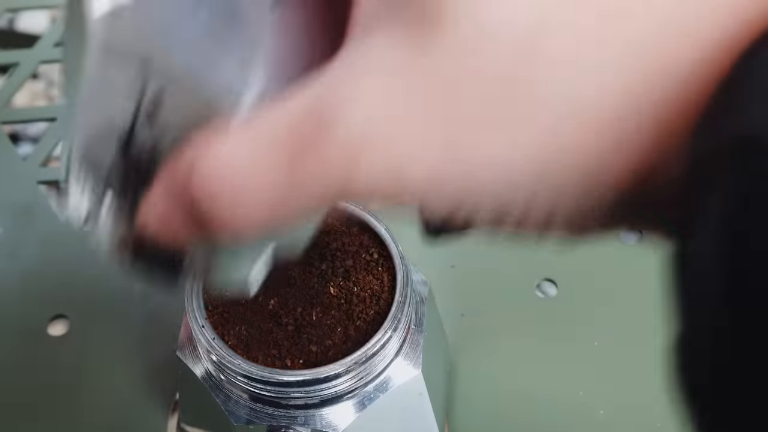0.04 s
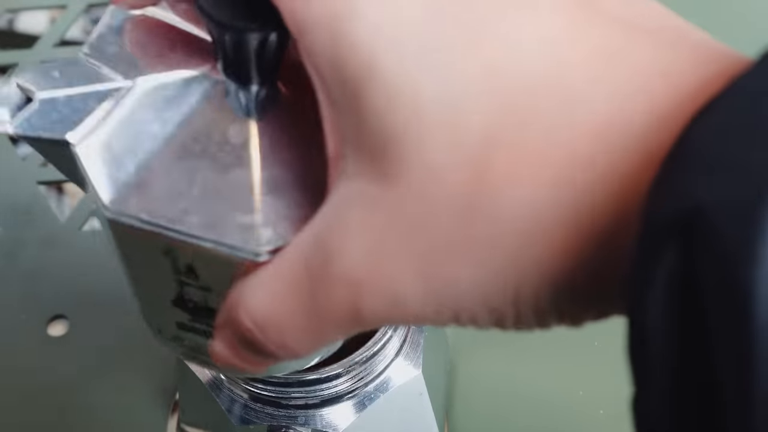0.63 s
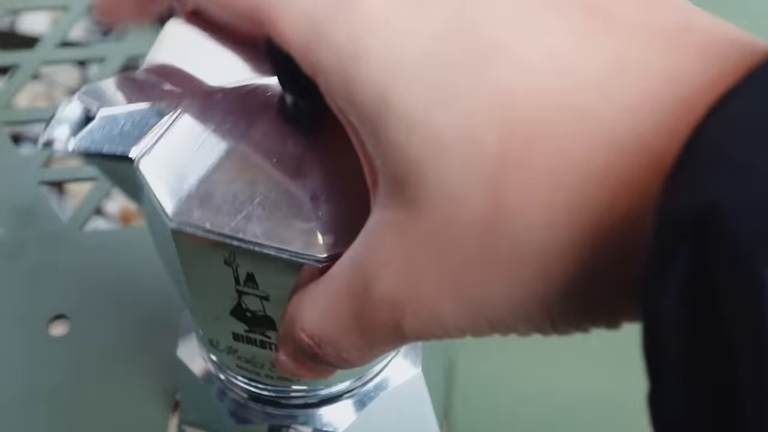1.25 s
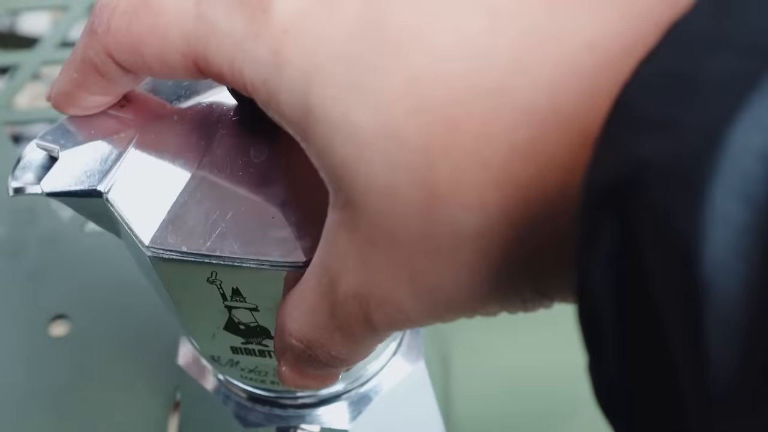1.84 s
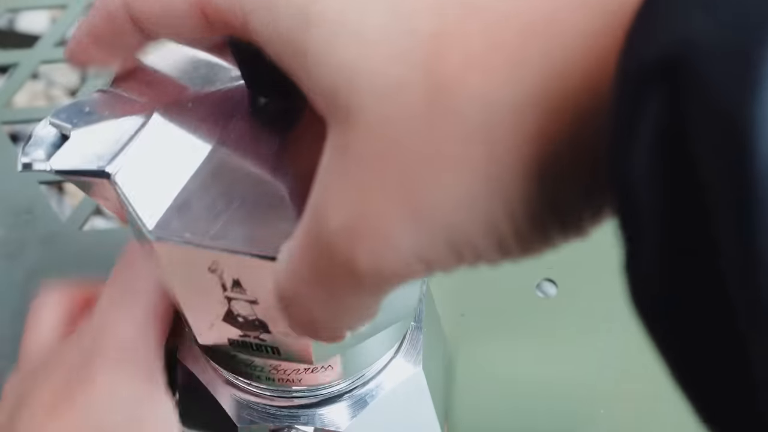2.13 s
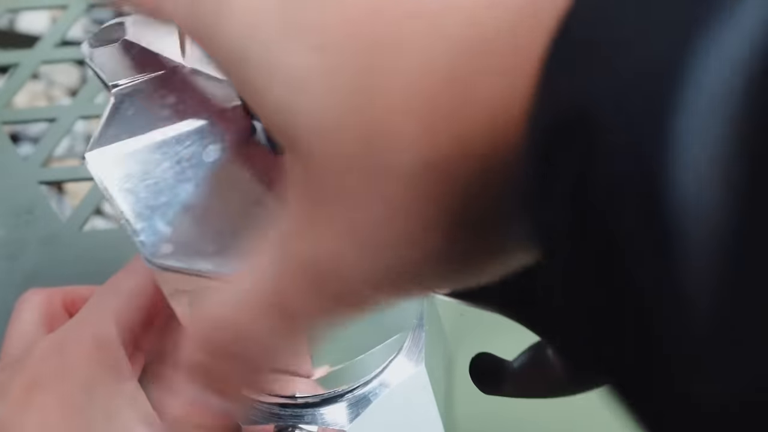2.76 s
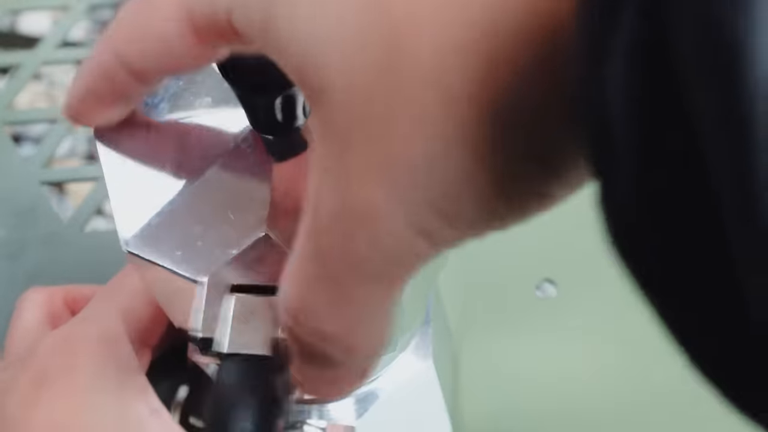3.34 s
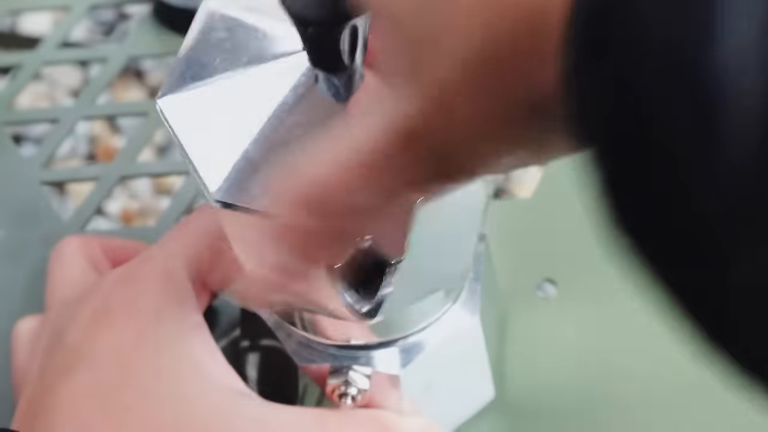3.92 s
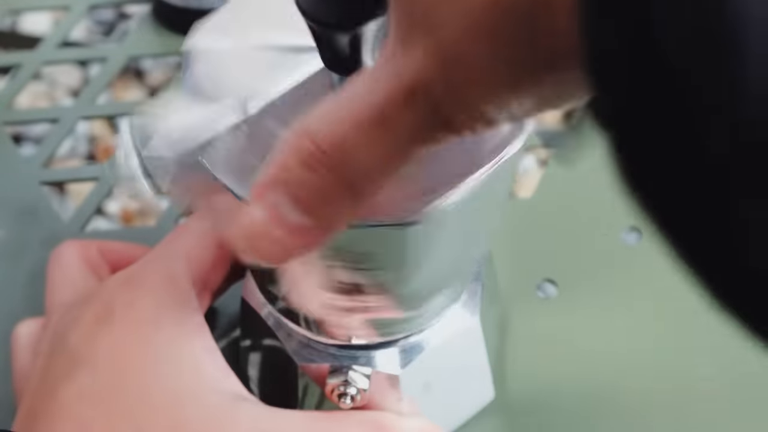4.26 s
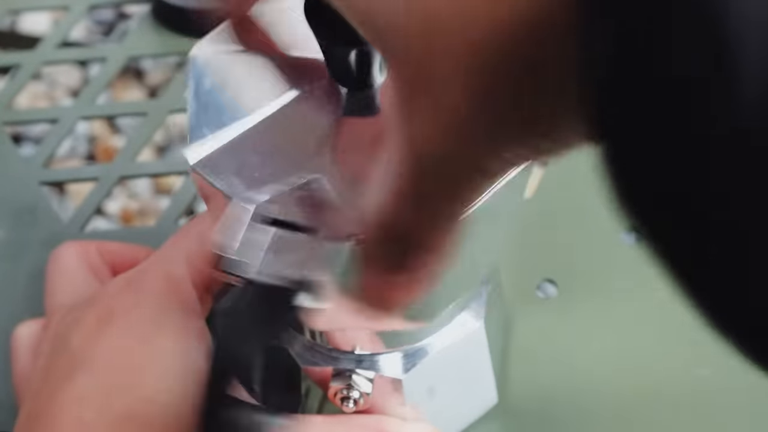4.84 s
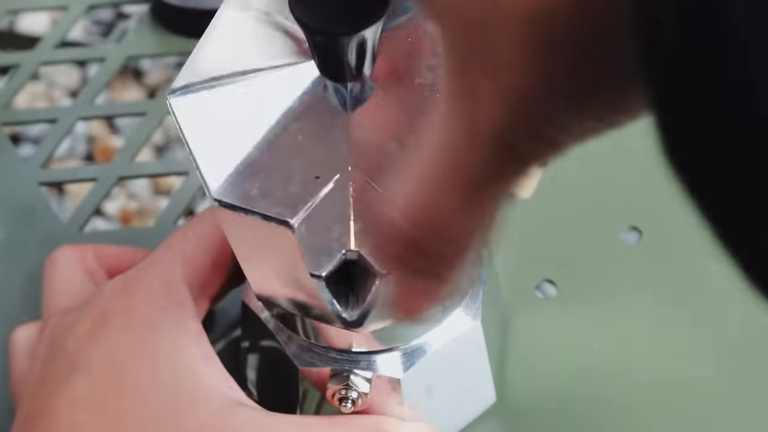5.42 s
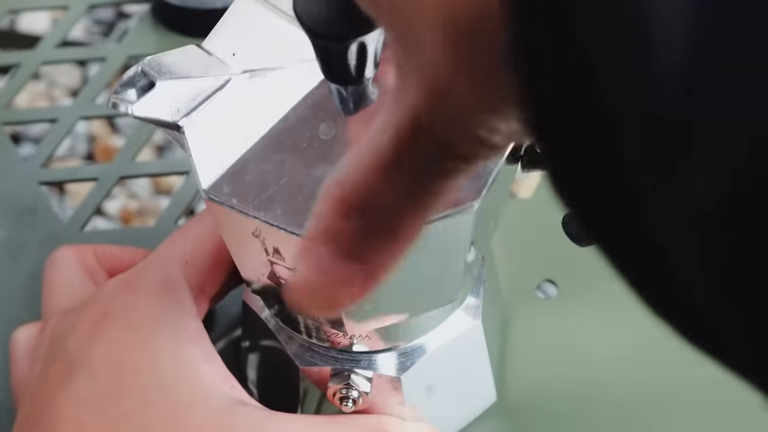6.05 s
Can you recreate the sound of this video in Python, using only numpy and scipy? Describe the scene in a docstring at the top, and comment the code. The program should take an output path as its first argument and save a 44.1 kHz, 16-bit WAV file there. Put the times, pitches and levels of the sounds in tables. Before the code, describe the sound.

A metal stovetop coffee pot is screwed together outdoors, with sharp clinks and short, gritty rasping twists.

```python
"""An aluminium stovetop coffee pot is screwed together on a garden table, close to the microphone.
The top half clinks onto the base, drops into the thread and goes down in rasping twists: the dry
threads catch and slip, crush grit and now and then squeak. Fingers brush the metal in between, and
the table booms faintly under a few hard knocks. The pot is centred and almost mono, with a short
tail from nearby walls; far behind it lies a low outdoor rumble."""
import sys
import numpy as np
from scipy import signal
from scipy.fft import rfft, irfft, next_fast_len
from scipy.io import wavfile
from scipy.ndimage import uniform_filter1d

SR = 44100
rng = np.random.default_rng(int(sys.argv[2]) if len(sys.argv) > 2 else 0)


def log_audio(samples):
    """Write samples as a 16-bit WAV file to the path given in sys.argv[1]."""
    # one column per channel
    frames = np.atleast_2d(samples).T
    # limit to full scale, then quantise
    limited = np.clip(frames, -1, 1)
    pcm = np.round(limited * 32767).astype(np.int16)
    wavfile.write(sys.argv[1], SR, pcm)


N = 268249
TIME = np.arange(N) / SR

# metal knocking on metal:
# (time [s], force [dB], treble [dB], chatter t60 [s], relative ring [dB], pitch the spot favours [Hz])
CLINKS = [ (.3163, -35.5, 0, 0.042, -22, 3700), (.681, -40, -5, .02, 7.5, 1315),
          (.698, -30.5, -4, 0.01, -17, 3560), (.727, -36, 1, 0.023, -7, 5970),
          (.7632, -27.5, 6.5, 0.019, -5.5, 4560), (.8525, -16, 0, 0.053, -11.5, 4240),
          (.866, -22.5, -9, 0.098, -11, 2780), (.914, -18.5, 9, 0.018, -11, 4600),
          (.925, -22, 7, 0.25, -2.5, 3676), (1.2295, -35, -12, 0.039, -13, 3800),
          (1.254, -40, -14, 0.017, -13, 2860), (1.332, -41.5, 1, 0.013, -15, 3700),
          (1.4823, -36.5, -8, 0.056, -21, 3720), (2.4531, -35, -25, 0.071, -18, 3740),
          (2.5303, -18, 5.5, 0.12, -5, 2833), (2.539, -22, 1, 0.059, -4, 2823),
          (2.549, -19.5, -2, 0.2, 0, 3550), (2.9994, -38, -17, 0.039, -12, 3800),
          (3.047, -40, -11, .04, -16, 3897), (3.11, -40, -12, 0.019, -27, 3800),
          (3.3435, -38, 4, 0.035, -6, 4485), (3.3938, -35, -18, 0.13, -23, 3920),
          (3.4821, -31, -7, 0.082, 3.5, 3600), (3.586, -44, 3, .03, -16, 3700),
          (3.603, -30.5, -7, 0.027, -24, 3730), (3.915, -19.5, 1, 0.029, 0, 3476),
          (3.974, -26, 2, 0.018, -16, 3980), (4.1642, -32, -10, 0.028, -49, 3670),
          (4.203, -29.5, 4.5, 0.02, -1, 8690), (4.2579, -20.5, 4.5, 0.062, -9, 3560),
          (4.274, -24, 10, 0.054, -6.5, 3820), (4.3187, -32, 8, .02, -7, 6400),
          (4.3486, -30.5, 4, .028, -8, 3897), (4.400, -23, -1.5, 0.13, -20, 3560),
          (4.4751, -31.5, 7.5, .021, -4.5, 6320), (4.5676, -26, 2, 0.071, -8, 6460),
          (4.588, -25.5, 9, 0.046, -3, 6440), (4.602, -24, -7, 0.025, -5.5, 3790),
          (4.6521, -24, 2.5, 0.045, -16, 6370), (4.74, -39.5, 0, 0.029, -12, 6440),
          (4.8665, -18.5, -15, 0.029, -2.5, 3800), (5.0103, -18, -9, 0.028, -1.5, 3820),
          (5.2217, -23.5, -11, 0.019, -12, 3580), (5.2441, -18, -26, 0.013, -8.5, 3640),
          (5.276, -38.5, 14, .039, 9, 7540), (5.3087, -16, -3.5, 0.11, -4, 3940),
          (5.5577, -35, 7, 0.011, -4.5, 7400), (5.6627, -23.5, -5, 0.047, -8, 3320),
          (5.699, -28.5, 5, 0.057, -13, 6400), (5.7786, -32, -16, .035, -17, 3320),
          (5.9182, -41, 3, .02, 0, 6400), (5.954, -36, -16, .025, -19, 3930),
          (5.9926, -18, -6, 0.049, 0.5, 3480), (6.071, -25, 3, 0.048, 4.5, 3760)]
# the halves sliding on each other:
# (time of full pressure [s], hold [s], pressure [dB], rise [s], fall [s], treble [dB], bass [dB])
STROKES = [ (.70, 0.1, -43.5, 0.015, 0.038, 7, -10), (0.854, .045, -28.5, .05, 0.08, 5, -7.5),
           (2.535, 0.042, -29, 0.012, .06, 13.5, -3.5), (3.097, 0.019, -33, 0.12, 0.1, -7, 9),
           (3.482, .012, -28, 0.0085, 0.084, -3, 6.5), (3.576, 0.033, -41, .04, 0.14, -11, 8),
           (3.915, 0.037, -23.5, 0.11, 0.061, -0.5, 3.5), (4.216, 0.14, -30, 0.042, .05, 0, 0.5),
           (4.569, 0.026, -26.5, 0.036, 0.1, 1, -0.5), (4.651, .018, -32, 0.0086, 0.087, 4.5, 2),
           (4.866, .04, -35.5, 0.0078, 0.068, -7, 4), (4.953, 0.084, -27.5, 0.053, 0.064, 3, -1),
           (5.251, 0.028, -27, .035, 0.082, -4, -7), (5.315, 0.024, -27.5, 0.016, .1, -3, 2),
           (5.662, 0.041, -30.5, 0.074, 0.051, -6, 0), (5.76, 0.023, -39.5, 0.072, 0.053, 4.5, -9),
           (5.969, 0.1, -35, 0.027, 0.11, 0.5, -1.5)]
# the pot's modes: (frequency [Hz], level [dB], t60 before the grip damps it [s])
POT_MODES = [(430, -39, 0.075), (1170, 9, .07), (1217, 7, 0.037), (1650, -25, 0.11), (2313, 7, 0.21),
             (2766, 13.5, 0.23), (2920, -2, 0.17), (3563, 6.5, 0.098), (3570, 3.5, 0.12), (3730, 7, 0.18),
             (3829, 13.5, 0.027), (3916, -2.5, 0.43), (3875, 1, 0.14), (3960, -26, 0.42),
             (4375, 12.5, 0.41), (4730, 11.5, 0.44), (5530, 4, .14), (6445, 3, 0.11), (6570, -11, .14),
             (7410, -0.5, 0.15), (8300, -13, .12), (8690, -3, 0.032)]
# colour of its dense, hand-damped modes under a knock and under a rasp: (frequency [Hz], level [dB])
KNOCK_COLOUR = [(80, -21), (230, -0.5), (400, 11), (560, -13), (1100, 0.5), (2300, -2), (3100, -1.5),
                (3700, 6), (4400, -6), (5500, -12.5), (6400, -3), (7300, -13), (11000, -20.5),
                (16000, -23.5)]
RASP_COLOUR = [(90, -27), (230, 1), (330, 5), (410, 2), (550, -2), (1100, 1), (2000, -2.5), (3000, -5),
               (3750, 1), (4400, -7.5), (5500, -23), (6450, -16.5), (7200, -27), (16000, -34.5)]
# as the joint tightens, the slips reach the heavy base and the rasp deepens: (time [s], bass [dB])
TIGHTNESS = [(3.0, -28), (4.0, -7), (5.0, 2.5)]
# colour of grit crushed in the thread: (frequency [Hz], level [dB])
GRIT_COLOUR = [(1500, -18), (3600, 7.5), (5600, 2), (6450, -3), (7100, -7), (9000, -8), (16000, -8.5)]
# stick-slip groans and chirps: (time [s], length [s], pitch [Hz], level [dB])
SQUEAKS = [(2.763, 0.04, 403, -44), (2.871, 0.036, 447, -44.5), (2.977, 0.043, 398, -34.5),
           (3.025, 0.05, 387, -35.5), (3.106, 0.013, 419, -33), (3.585, 0.032, 446, -38.5),
           (3.921, 0.039, 395, -31), (3.986, 0.049, 1700, -40), (4.64, 0.02, 362, -27),
           (5.689, 0.024, 311, -34.5), (5.747, 0.016, 280, -35.5), (5.756, .04, 669, -40)]
# skin and sleeve brushing the pot, and hollow rubs of a new grip: (middle [s], length [s], level [dB])
BRUSHES = [(1.25, 0.066, -44.5), (1.35, 0.054, -46), (1.48, 0.098, -53), (2.19, 0.21, -45.5),
           (2.46, 0.092, -53.5), (3.75, 0.74, -58)]
REGRIPS = [(1.083, 0.019, -38.5), (4.11, 0.27, -44)]
# colour of the brushing: (frequency [Hz], level [dB])
SKIN_COLOUR = [(500, -8.5), (1200, 3), (3000, 0), (5000, -3.5), (8000, -10.5), (11000, -15.5), (16000, -14)]
# knocks that reach the sheet-metal table: (time [s], level [dB])
LANDINGS = [(0.853, -39.5), (0.9131, -32), (2.5293, -40.5), (3.9168, -39.5), (5.3084, -57)]
# the table's modes: (frequency [Hz], level [dB], t60 [s])
TABLE_MODES = [(139.3, -8, 1), (206.4, -7, 0.91), (233, -5, 0.64), (299.4, -12.5, 1), (401, -7, 0.19),
               (441, -2.5, 0.76)]
# decay of the reflections off nearby walls and table: (frequency [Hz], t60 [s])
TAIL_DECAY = [(200, 0.12), (530, 0.38), (1400, 0.24), (3700, 0.089), (10000, 0.27)]
# colour of the distant background: (frequency [Hz], level [dB])
AIR_COLOUR = [(12, -46), (26, -14), (45, -5.5), (70, -0.5), (140, 0.5), (290, 0.5), (450, -8), (570, -21),
              (760, -24), (1100, -11.5), (1600, -11.5), (3000, -15.5), (7000, -29), (16000, -37.5)]


def clinks(spot_width=0.03, elsewhere_db=-13, held=0.24, free=0.73, crack_s=0.0015, rim_t60=0.03):
    """Each knock is a crack and a brief chatter of the contact; it rings the modes its spot favours."""
    t, out = np.arange(SR // 3) / SR, np.zeros(N)
    rise = 1 - np.exp(-t / 0.00045)
    crack = gain_of(-1) * np.exp(-(t / crack_s) ** 4)
    for s, db, treble_db, t60, ring_db, spot_hz in CLINKS + burrs():
        fade = rise * (gain_of(-60 * t / t60) + crack)
        fade /= np.sqrt(np.mean(fade[:SR // 200] ** 2))  # rms 1 over the first 5 ms
        contact = colour(fade * rng.choice([-1., 1.], len(t)), KNOCK_COLOUR)
        contact /= np.linalg.norm(contact)
        # a few short-lived modes of the rim, other ones at every spot
        rim_hz = 3400 * np.exp(0.2564 * np.clip(rng.standard_normal((5, 1)), -2, 2))
        rim = np.sin(2 * np.pi * (rim_hz * t + rng.random(rim_hz.shape))).sum(0)
        rim *= rise * gain_of(-60 * t / rim_t60)
        contact += gain_of(-5) * rim / np.linalg.norm(rim)
        contact *= np.linalg.norm(fade) / np.linalg.norm(contact)
        # the favoured modes ring on, the grip cuts the others short
        favour = np.exp(-(np.log(np.transpose(POT_MODES)[0] / spot_hz) / spot_width) ** 2)
        modes = pot_modes(freedom=held + (free - held) * favour)
        ringing = gain_of(ring_db - 5) * rise * ((gain_of(elsewhere_db) + favour) @ modes)
        thud_db = -6.5 - 0.5 * ring_db  # a firmly gripped pot rings less and thuds more
        add(out, s, gain_of(db) * (tone(contact, treble_db, thud_db) + ringing))
    return out


def pot_modes(freedom):
    """The casting rings as one dying sine a mode, at a random phase; freedom scales the ring times."""
    t = np.arange(SR // 3) / SR
    hz, db, t60 = np.transpose(POT_MODES)
    cycles = hz[:, None] * t + rng.random((len(hz), 1))
    damped_t60 = np.maximum(t60 * freedom, .03)
    return gain_of(db[:, None] - 60 * t / damped_t60[:, None]) * np.sin(2 * np.pi * cycles)


def burrs(per_stroke=2, spread_db=3.5, chatter_t60=0.06, ring_db=-8.5, spot_hz=3615):
    """The threads catch on burrs: small knocks, stronger under more pressure, as rows like CLINKS."""
    rows = []
    for start, hold, pressure_db, _, _, treble_db, _ in STROKES:
        for when, size in rng.random((per_stroke, 2)):
            force_db = pressure_db - 5 + spread_db * (2 * size - 1)
            rows.append((start + when * hold, force_db, treble_db, chatter_t60, ring_db, spot_hz))
    return rows


def threads(slips_per_s=4500, spread_db=2.5, clump_db=1.7, ring_db=-13):
    """The dry threads catch and slip in tiny clumped jerks that shake the pot."""
    size = gain_of(spread_db * np.minimum(rng.exponential(1, N), 4)) * rng.choice([-1, 1], N)
    slipping = rng.random(N) < slips_per_s / SR
    slips = unit_rms(size * slipping * gain_of(clump_db * wander(rate_hz=90)))
    presses = np.array([pressure(*row[:5]) for row in STROKES])
    force = presses.sum(0)
    drive = shifting_grip(bouncing(slips, t60=0.018)) * force
    ring = pot_modes(freedom=0.21).sum(0)
    ringing = signal.fftconvolve(drive, ring / np.linalg.norm(ring))[:N]
    body = colour(drive, RASP_COLOUR) + gain_of(ring_db) * ringing
    deepening_db = np.interp(TIME, *np.transpose(TIGHTNESS))
    body = tone(body, 0, deepening_db, bass_hz=270)
    treble_db, bass_db = np.transpose(STROKES)[5:] @ presses / force  # the strongest stroke leads
    return gain_of(0.5) * tone(body + force * grit(), treble_db, bass_db)


def pressure(start, hold, db, rise, fall, range_db=19):
    """One turn of the wrist as a gain: it builds, holds and lets go, by range_db a rise or fall time."""
    before = np.maximum((start - TIME) / rise, 0)
    after = np.maximum((TIME - start - hold) / fall, 0)
    return gain_of(db - np.minimum(range_db * (before + after), 120))


def bouncing(x, t60):
    """A slip runs back and forth through the casting for a few milliseconds."""
    t = np.arange(SR // 20) / SR
    spectrum = rfft(rng.standard_normal(len(t)) * gain_of(-60 * t / t60))
    paths = irfft(spectrum / np.sqrt(uniform_filter1d(abs(spectrum) ** 2, size=15)))  # whitened
    return signal.fftconvolve(x, paths)[:len(x)]


def shifting_grip(x, depth_db=3.5, span_frames=9, span_bins=4):
    """The moving grip and contact point favour ever different resonances."""
    spectra = signal.stft(x, nperseg=512, noverlap=384)[2]
    patches = uniform_filter1d(rng.standard_normal(spectra.shape), span_bins, axis=0)
    patches = uniform_filter1d(patches, span_frames, axis=1)
    gain = unit_rms(gain_of(depth_db * np.clip(unit_rms(patches), -2, 2)))
    return signal.istft(spectra * gain, nperseg=512, noverlap=384)[1][:len(x)]


def grit(grains_per_s=60, spread_db=4, ring_hz=6470, ring_t60=0.016):
    """Grit cracks in the thread as sparse bright ticks, each setting the collar ringing briefly."""
    size = gain_of(spread_db * np.minimum(rng.exponential(1, N), 3))
    grains = size * (rng.random(N) < grains_per_s / SR)
    ticks = unit_rms(colour(bouncing(grains, t60=0.017), GRIT_COLOUR))
    t = np.arange(SR // 10) / SR
    collar = np.sin(2 * np.pi * ring_hz * t) * gain_of(-60 * t / ring_t60)
    ringing = unit_rms(signal.fftconvolve(grains, collar)[:N])
    return gain_of(-19) * (ticks + gain_of(-4) * ringing)


def squeaks(waver=0.088, overtone_db=-17):
    """Slips fall into step for a moment and give a rough, wavering tone."""
    out, unsteady = np.zeros(N), wander(rate_hz=186)
    for s, length, hz, db in SQUEAKS:
        speed = 1 + waver * unsteady[round(s * SR):][:round(length * SR)]
        phase = 2 * np.pi * np.cumsum(hz * speed) / SR
        wave = np.sin(phase) + gain_of(overtone_db) * np.sin(2 * phase)
        add(out, s, gain_of(db) * unit_rms(np.hanning(len(wave)) ** .5 * wave))
    return out


def hands(grain_db=3, resting_db=-61.5):
    """Skin rests on the facets, brushes grainily over them and rubs hollowly as it takes a new grip."""
    friction = unit_rms(rng.standard_normal(N) * gain_of(grain_db * wander(rate_hz=200)))
    brushing = colour(friction, SKIN_COLOUR) * (gain_of(resting_db) + swells(BRUSHES))
    return brushing + hiss(hz=1600, width_hz=1300) * swells(REGRIPS)


def table():
    """Low modes of the table top, set off through the base of the pot."""
    out, t = np.zeros(N), np.arange(SR) / SR
    boom = sum(gain_of(db - 60 * t / t60) * np.sin(2 * np.pi * hz * t) for hz, db, t60 in TABLE_MODES)
    for s, db in LANDINGS:
        add(out, s, gain_of(db) * boom)
    return out


def reflections(x, build_s=0.0012):
    """Nearby walls and the table scatter a short tail back to the microphone."""
    echoes = rng.choice([-1., 1.], SR // 2) * (rng.random(SR // 2) < .15)
    hz, t, spectra = signal.stft(echoes, SR, nperseg=256)
    envelope = gain_of(-60 * t / curve_at(TAIL_DECAY, hz)[:, None]) * (1 - np.exp(-t / build_s))
    tail = signal.istft(spectra * envelope, SR, nperseg=256)[1]
    return signal.fftconvolve(x, tail / np.linalg.norm(tail))[:N]


def outdoors(air_db=-43, thin_hiss_db=-67):
    """A steady rumble and hush from far off, with a thin band of hiss high up."""
    air = unit_rms(colour(rng.standard_normal(N + SR), AIR_COLOUR, size=8192)[SR:])
    return gain_of(air_db) * air + gain_of(thin_hiss_db) * hiss(hz=13700, width_hz=600)


def gain_of(db):
    """Decibels to amplitude."""
    return 10 ** (np.asarray(db) / 20)


def unit_rms(x):
    """Scales to rms 1."""
    return x / np.sqrt(np.mean(x ** 2) + 1e-20)


def curve_at(points, hz):
    """Interpolates a curve on a log-frequency axis."""
    point_hz, value = np.transpose(points)
    return np.interp(np.log(hz + 1), np.log(point_hz + 1), value)


def add(mix, s, sound):
    """Mixes a sound in at time s."""
    part = mix[round(s * SR):][:len(sound)]
    part += sound[:len(part)]


def swells(rows):
    """Gain over time of soft gestures that come and go evenly."""
    return sum(gain_of(db) * np.exp(-np.minimum(2 * ((TIME - s) / length) ** 2, 20))
               for s, length, db in rows)


def colour(x, points, size=2048):
    """Causal filter with the given spectrum and unit power gain."""
    cepstrum = irfft(np.log(gain_of(curve_at(points, np.fft.rfftfreq(size, 1 / SR)))))
    cepstrum[1:size // 2] *= 2  # folded for minimum phase
    cepstrum[size // 2 + 1:] = 0
    taps = irfft(np.exp(rfft(cepstrum)))
    return signal.fftconvolve(x, taps / np.linalg.norm(taps))[:len(x)]


def tone(x, treble_db, bass_db, treble_hz=5300, bass_hz=600):
    """Two shelves: a sharp contact adds treble, a heavy one adds bass."""
    size = next_fast_len(len(x) + SR // 10, True)
    hz, spectrum = np.fft.rfftfreq(size, 1 / SR), rfft(x, size)
    high = irfft(spectrum / (1 + (treble_hz / (hz + 1)) ** 8), size)[:len(x)]
    low = irfft(spectrum / (1 + (hz / bass_hz) ** 4), size)[:len(x)]
    return x + (gain_of(treble_db) - 1) * high + (gain_of(bass_db) - 1) * low


def shaped_noise(response):
    """Noise of rms 1 whose spectrum follows a function of frequency."""
    size = next_fast_len(N, True)
    spectrum = rfft(rng.standard_normal(size)) * response(np.fft.rfftfreq(size, 1 / SR))
    return unit_rms(irfft(spectrum, size)[:N])


def wander(rate_hz):
    """Random drift, rolling off above rate_hz."""
    return shaped_noise(lambda f: np.exp(-(f / rate_hz) ** 2))


def hiss(hz, width_hz):
    """Noise in one resonance."""
    return shaped_noise(lambda f: 1 / (1 + (2 * (f - hz) / width_hz) ** 2))


def scene(wet_db=-7, side_db=-28):
    """The pot stands close and centred; only the treble of the knocks' reflections spreads a little."""
    knocks = clinks()
    pot = knocks + threads() + hands() + squeaks()
    mid = pot + gain_of(wet_db) * reflections(pot) + table() + outdoors()
    treble_only = signal.butter(2, 2400, "high", fs=SR, output="sos")
    side = gain_of(side_db) * signal.sosfilt(treble_only, reflections(knocks))
    return np.array([mid + side, mid - side])


def record(dry, low_cut_hz=33, band_limit_hz=15950):
    """The microphone feeds the recorder through a low cut and a steep band limit."""
    low_cut = signal.butter(3, low_cut_hz, "high", fs=SR, output="sos")
    band_limit = signal.firwin(511, band_limit_hz, window=("kaiser", 8), fs=SR)
    return signal.oaconvolve(signal.sosfilt(low_cut, dry), band_limit[None], "same")


dry = scene()
out = record(dry)
log_audio(out)
```